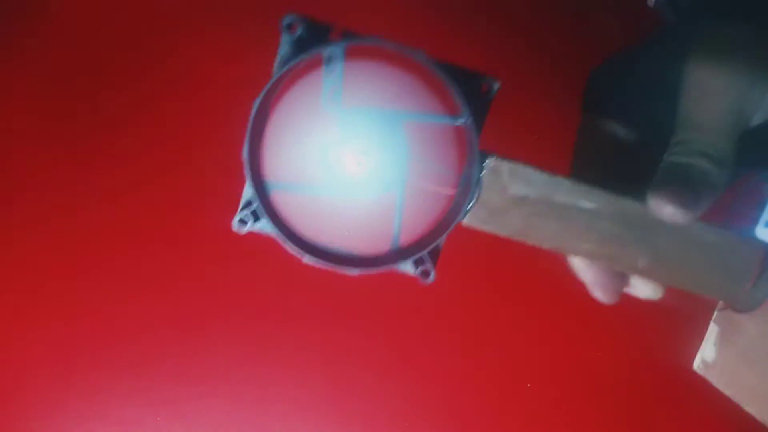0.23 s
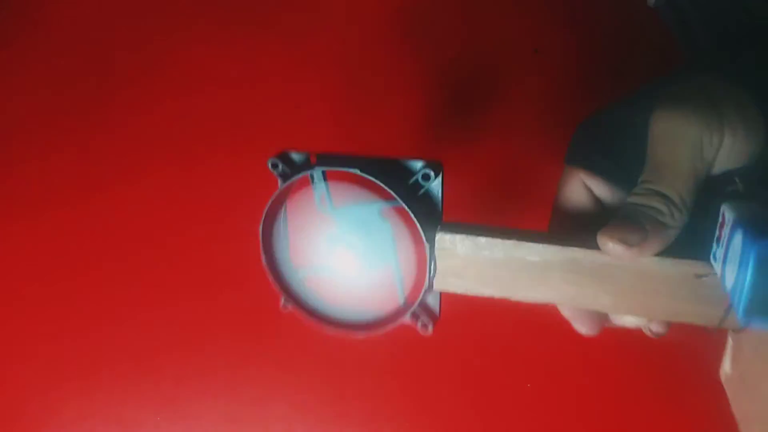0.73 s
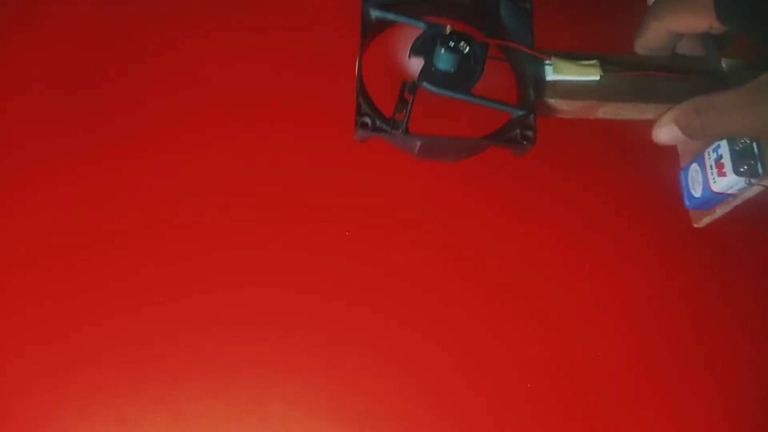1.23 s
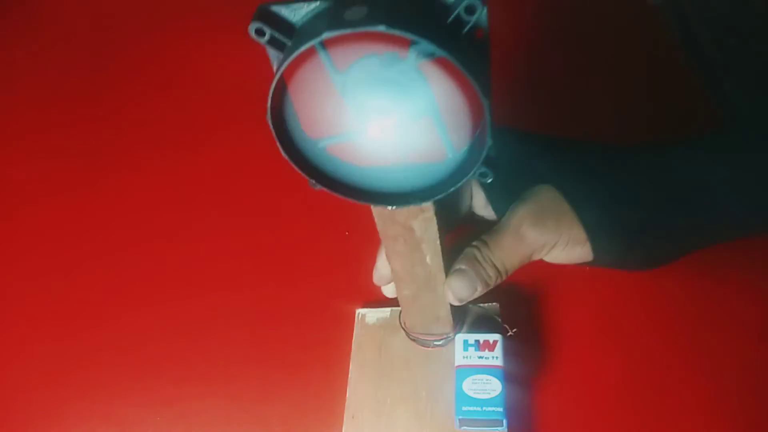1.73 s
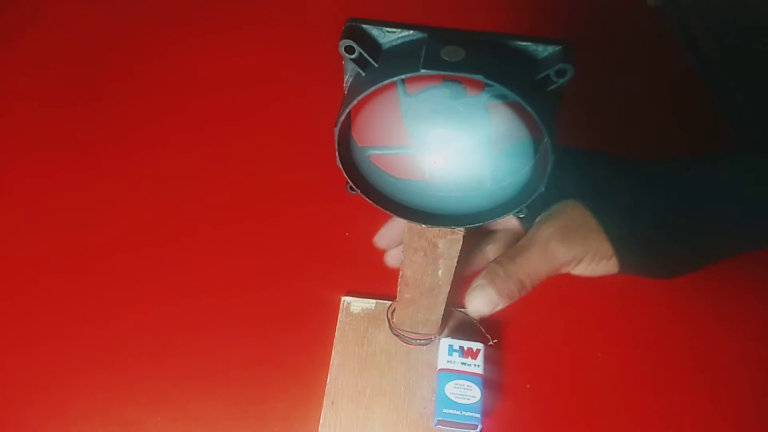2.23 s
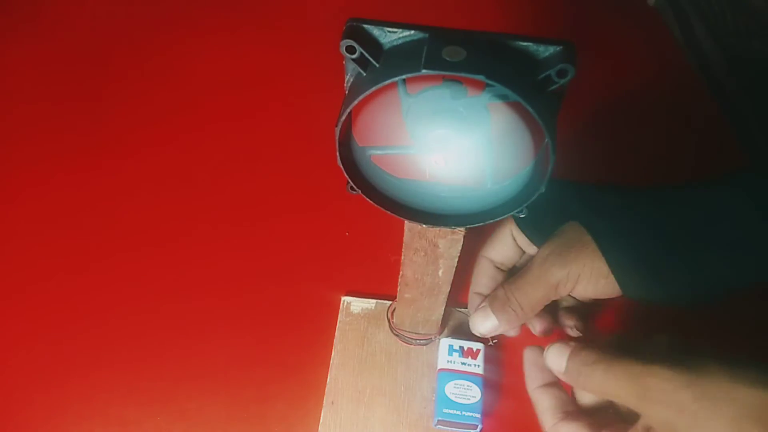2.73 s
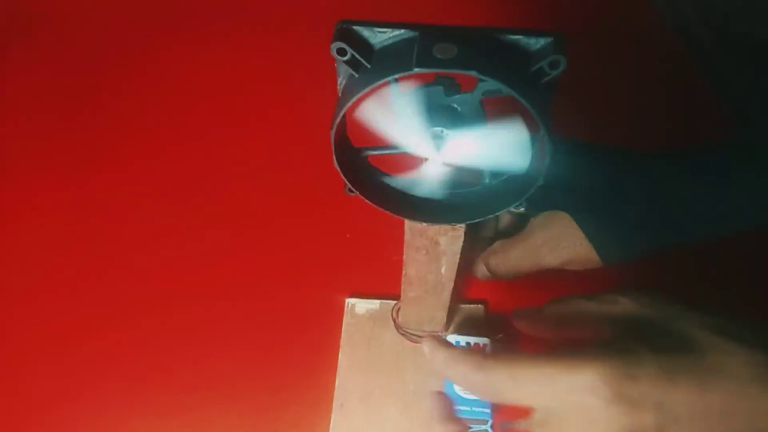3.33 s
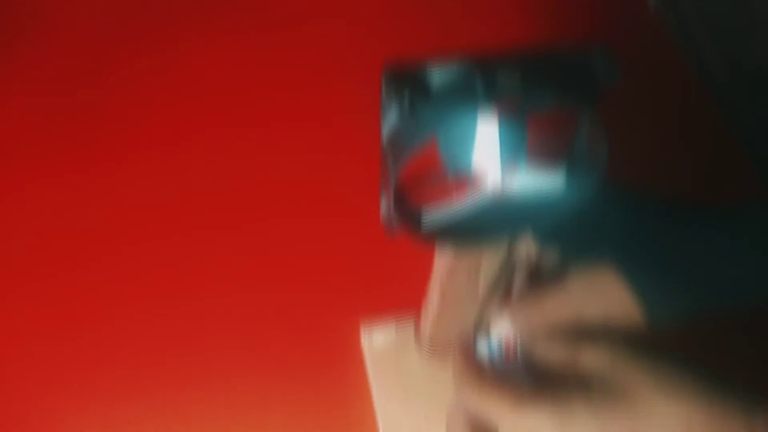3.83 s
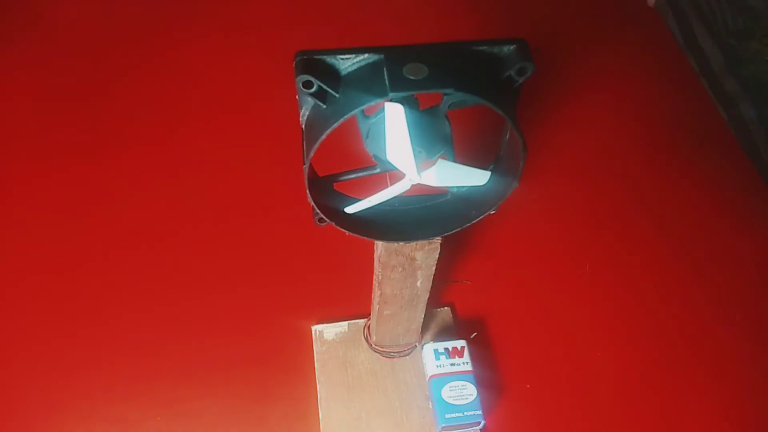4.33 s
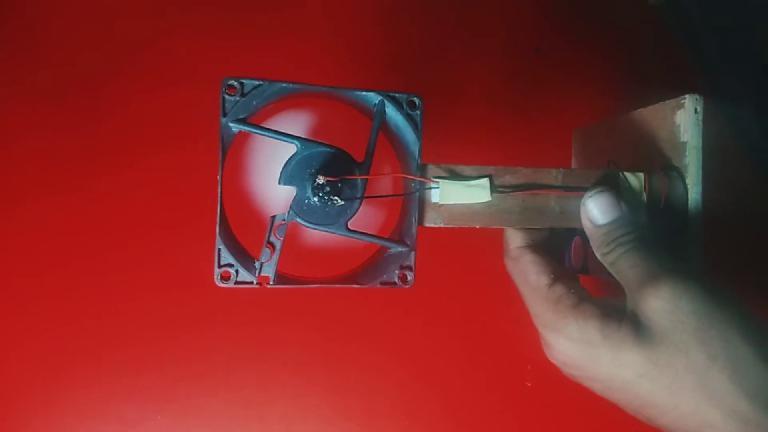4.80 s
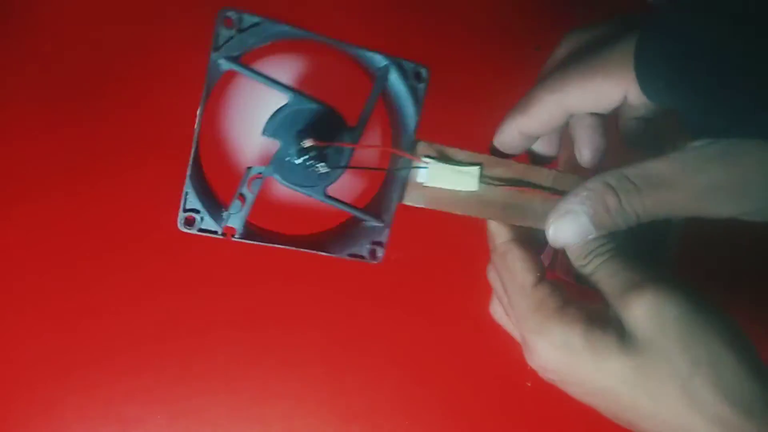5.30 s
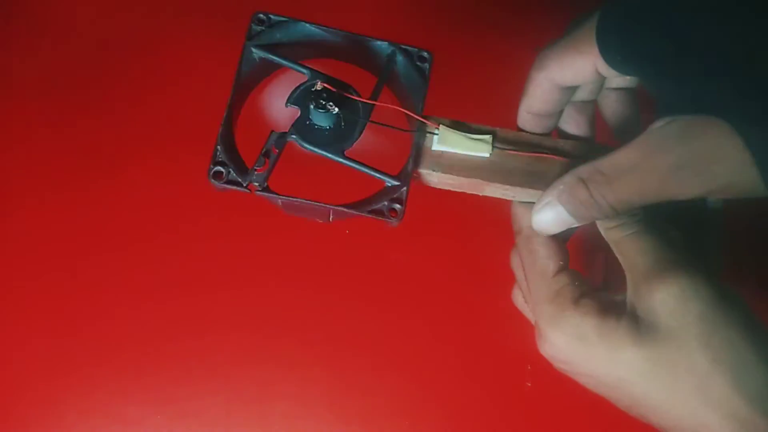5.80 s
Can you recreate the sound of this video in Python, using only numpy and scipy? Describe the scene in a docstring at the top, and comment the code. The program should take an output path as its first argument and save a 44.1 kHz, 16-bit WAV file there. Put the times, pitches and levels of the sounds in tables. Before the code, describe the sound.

A small electric fan whirs, winds down to faint handling noises, then spins up again and runs steadily with soft low thumps.

```python
"""In a quiet room, a small battery motor runs a three-blade fan on a hand-held wooden stand: its shaft
hums and whirls in a loose bearing, its brushes scrape and the plastic frame rings along. At 0.6 s the
battery is cut off and the rotor quickly coasts to a stop, leaving hands that rub, tick and bump close by.
At 3.2 s the battery is back, and the rotor catches and rasps as it speeds up. Near the end the motor's
back is turned to the microphone for about a second, and there is a quick run of louder low thumps."""
import sys
import numpy as np
from scipy import signal
from scipy.fft import rfft, irfft, next_fast_len
from scipy.io import wavfile
from scipy.ndimage import uniform_filter1d, map_coordinates

SR = 44100
rng = np.random.default_rng(int(sys.argv[2]) if len(sys.argv) > 2 else 0)


def materialize(psi):
    """Save the field psi as 16-bit PCM at rate SR to the path in sys.argv[1].

    A 1-D psi becomes a single channel; in a 2-D psi each row is a channel.
    """
    bounded = np.clip(np.atleast_2d(psi).T, -1, 1)
    quanta = np.round(bounded * 32767).astype(np.int16)
    wavfile.write(sys.argv[1], SR, quanta)


N = 267025
TIME = np.arange(N) / SR
SIDES = np.array([[.5], [-.5]])  # shares a difference between left and right


def amp(db):
    """Turn decibels into a gain."""
    return 10 ** (np.asarray(db) / 20)

def unit(x):
    """Scale a sound to an average strength (rms) of 1."""
    return x / np.sqrt(np.mean(x ** 2) + 1e-20)

def along(points, hz):
    """Read between (f/Hz, value) points on a log frequency axis."""
    f, v = np.transpose(points)
    return np.interp(np.log(hz + 1), np.log(f + 1), v)

def curves(rows):
    """One value per sample for each column after the time."""
    s, *columns = np.transpose(rows)
    return [np.interp(TIME, s, column) for column in columns]

def wobble(rate):
    """A smooth random curve through `rate` points a second."""
    return map_coordinates(rng.standard_normal(int(N * rate / SR) + 4), [TIME * rate])

def decay(s, db, ring_s, rise_s):
    """A loudness curve that rises at time s, then falls 60 dB in ring_s."""
    t = np.maximum(TIME - s, 0)
    return amp(db - 60 * t / ring_s) * (1 - np.exp(-t / rise_s))

def swell(s, length):
    """A smooth rise to 1 and fall, centred on time s."""
    return np.exp(-(2 * (TIME - s) / length) ** 2)

def add(track, s, sound):
    """Mix a sound into the track at time s."""
    part = track[:, round(s * SR):][:, :sound.shape[-1]]
    part += sound[..., :part.shape[1]]

def filtered(x, response):
    """Give each frequency of a sound the gain response(hz)."""
    size = next_fast_len(N + SR // 2)
    return irfft(rfft(x, size) * response(np.fft.rfftfreq(size, 1 / SR)), size)[..., :N]

def patchy(x, depth_db):
    """Make brief patches of a sound's spectrum louder and softer by chance."""
    spectra = signal.stft(x, nperseg=256)[2]
    patches = uniform_filter1d(rng.standard_normal(spectra.shape[1:]), size=6, axis=0)
    patches = unit(uniform_filter1d(patches, size=9, axis=1))
    return unit(signal.istft(spectra * amp(depth_db * patches), nperseg=256)[1][:, :N])

# How alike left and right are: f/Hz, likeness/0-1
LIKENESS = [(60, .2), (250, .55), (1000, .6), (2000, .55), (4000, .45), (8000, .65), (11000, .6),
            (14000, .42)]
def noise(colour):
    """Stereo noise of strength 1, partly alike in both ears; the colour table sets only its shape."""
    def response(hz):
        width = np.arccos(np.clip(along(LIKENESS, hz), -1, 1)) / 2
        return amp(along(colour, hz)) * [np.cos(width), np.sin(width)]
    mid, side = filtered(rng.standard_normal((2, N)), response)
    return unit(np.array([mid + side, mid - side]))

def ringing(notes):
    """Noise of strength 1 from an object shaken into ringing at its own notes."""
    def response(f):
        return sum((-1) ** k * amp(db) * 1j * f * width / (hz * hz - f * f + 1j * f * width)
                   for k, (hz, width, db) in enumerate(notes))
    shaking = noise([(700, -32), (1300, 1), (4600, -2.5), (6500, -32)])
    return unit(filtered(shaking, response))

def tone(phase, sway_db, spread, rate):
    """A stereo tone of strength 1 whose loudness and direction wander."""
    gain = amp(sway_db * wobble(rate))
    apart = spread * wobble(rate)
    return unit(gain * np.sin([phase + apart, phase - apart]))

# Colour of the room's background: f/Hz, level/dB
ROOM_COLOUR = [(15, -49), (25, -43), (61, 0.5), (91, -2.5), (215, -7), (289, -13), (457, -12.5),
               (945, -19.5), (1270, -21.5), (3930, -29), (6380, -35.5), (14300, -29.5), (15500, -20)]
def quiet_room():
    """A faint, steady rumble with a little hiss."""
    return amp(-65) * noise(ROOM_COLOUR)

def room_echo(fan, ring_s=.39, lowest_hz=300):
    """A short wash of echoes, different at each ear; the small fan sends little bass into the room."""
    sent = filtered(fan, lambda hz: hz ** 4 / (hz ** 4 + lowest_hz ** 4))
    t = TIME[:SR // 2]
    tail = rng.standard_normal((2, len(t))) * amp(-60 * t / ring_s) * (t > .004)
    return signal.fftconvolve(sent, tail / np.linalg.norm(tail[0]), axes=1)[:, :N]

# Colours of dry rubbing and of fine hiss, for fingers and motor alike: f/Hz, level/dB
RUB_COLOUR = [(290, -21), (500, 0.5), (1130, -2.5), (1300, -3), (2800, -5.5), (4540, -9.5), (6300, -26.5),
              (15000, -18)]
HISS_COLOUR = [(3000, -13), (6500, -9.5), (8300, -16), (11000, -5.5), (13500, -1), (15500, 0)]
# Notes of the frame with the motor's can, and of dry skin on wood: f/Hz, width/Hz, level/dB
FRAME_NOTES = [(1844, 58, -1), (2100, 63, -4), (2310, 62, 1.5), (2414, 89, -2.5), (2813, 60, 2),
               (2870, 67, -13), (3230, 96, -5), (3645, 155, -0.5), (3813, 83, 0.5), (4330, 76, -3)]
SKIN_NOTES = [(2760, 77, 10), (4680, 140, -8), (3920, 290, -3)]
# Fingers slide on the wood, and on the battery clip: middle t/s, length/s, level/dB
WOOD_SLIDES = [(0.927, 0.44, -72), (1.29, 0.19, -71), (1.457, 0.065, -68.5), (1.673, 0.62, -71.5),
               (2.754, 0.098, -73.5)]
CLIP_SLIDES = [(.99, .05, -76), (3.245, 0.047, -70), (3.305, 0.048, -64)]
# Skin squeaks: middle t/s, length/s, f/Hz, level/dB
SKIN_SQUEAKS = [(1.325, .06, 4450, -77), (1.465, 0.047, 4740, -71), (1.535, .09, 2830, -73),
                (1.53, .1, 4950, -77), (1.98, .035, 3000, -72), (1.835, .025, 4140, -78),
                (2.755, .05, 1400, -72)]
# Ticks of wire and battery: t/s, level/dB, ring time/s, added bright snap/dB
WIRE_TICKS = [(1.813, -52.5, .016, -20), (1.819, -63, .04, -5), (1.829, -56.5, .016, -2),
              (1.832, -65, .05, 9), (1.959, -62.5, .11, -25), (1.978, -65, .06, -25)]
def fingers():
    """Skin rustles and squeaks faintly on the wood; wire and battery tick; the frame rings along."""
    body = noise(RUB_COLOUR) + amp(-15.5) * ringing(FRAME_NOTES) + amp(-11.5) * ringing(SKIN_NOTES)
    snap = noise(HISS_COLOUR)
    ticks = sum(decay(s, db, ring_s, rise_s=.0007) * (body + amp(snap_db) * snap)
                for s, db, ring_s, snap_db in WIRE_TICKS)
    rustle = sum(amp(db) * swell(s, length) for s, length, db in WOOD_SLIDES) * (body + amp(-3) * snap)
    squeaks = sum(amp(db) * swell(s, length) * ringing([(hz, 220, 0)])
                  for s, length, hz, db in SKIN_SQUEAKS)
    hiss = sum(amp(db) * swell(s, length) for s, length, db in CLIP_SLIDES) * snap
    return amp(wobble(150)) * (rustle + squeaks + hiss) + ticks

# Short sliding low tones: t/s, length/s, start f/Hz, end f/Hz, level/dB
GROANS = [(0.687, 0.075, 326, 280, -54), (0.8, 0.038, 231.3, 215, -56.5), (1.175, 0.13, 369, 343, -57.5),
          (1.178, 0.21, 237.4, 212, -55.5), (1.307, 0.058, 323, 338, -61), (1.426, 0.05, 278, 270, -52.5),
          (1.51, 0.054, 262, 245, -53.5), (1.618, 0.1, 226, 216, -46.5), (1.721, 0.04, 223, 216, -49),
          (3.317, 0.097, 62.4, 87, -46.5), (3.398, 0.098, 305, 377, -48.5)]
def groans():
    """Short rough low tones that slide in pitch: rubs, and the rotor slowing or speeding up."""
    out = np.zeros((2, N))
    for s, length, start_hz, end_hz, db in GROANS:
        n = int(length * SR)
        hz = np.linspace(start_hz, end_hz, n) * (1 + .052 * wobble(156)[:n])
        loudness = amp(db + 3.5 * wobble(77.5)[:n]) * np.sin(np.linspace(0, np.pi, n))
        add(out, s, loudness * np.sin(2 * np.pi * np.cumsum(hz) / SR))
    return out

# Low thumps, with a quick run of louder ones near the end: t/s, length/s, level/dB, f/Hz
THUMPS = [(0.043, .02, -37.5, 133), (0.135, .02, -38.5, 136), (0.727, .1, -50, 117), (0.897, .1, -49, 99),
          (1.547, .06, -56.5, 88), (1.816, .06, -54, 79.7), (2.087, .02, -48.5, 82), (2.157, .06, -51, 77),
          (2.294, .02, -55.5, 75), (2.445, .02, -53, 83.5), (2.607, .1, -48.5, 76),
          (2.881, .02, -52, 204.6), (3.027, .02, -57, 94), (3.211, .06, -51.5, 199.4),
          (3.233, .02, -50.5, 91), (4.037, .02, -37, 85), (4.36, .02, -37, 100), (4.406, .02, -31.5, 138),
          (4.734, .02, -37, 184), (4.804, .02, -32.5, 142), (4.996, .02, -39, 143),
          (5.125, .02, -34.5, 138.7), (5.357, .06, -30.5, 111.1), (5.478, .02, -30.5, 112.9),
          (5.566, .02, -22, 162.6), (5.606, .02, -27.5, 114.9), (5.648, .02, -28.5, 130),
          (5.68, .02, -25, 118), (5.718, .02, -27.5, 120), (5.755, .02, -23, 122),
          (5.785, .02, -27.5, 105.1), (5.9, .02, -29, 113)]
def thump_list(gap_s=.037, nudge_count=24, nudge_db=-55.5, nudge_hz=83.3):
    """Thumps as (t/s, level/dB, f/Hz): one or an uneven run per row, plus faint chance nudges."""
    runs = [(s + delay, db, hz, delay > 0)
            for s, length, db, hz in THUMPS for delay in np.arange(0, length, gap_s)]
    nudges = [(s, nudge_db, nudge_hz, True) for s in rng.uniform(0, N / SR, nudge_count)]
    s, db, hz, uneven = np.transpose(nudges + runs)
    later, stronger, higher = uneven * (rng.standard_normal((len(s), 3)) * [.002, 1.2, .1]).T
    return zip(np.abs(s + later), db + stronger, hz * np.exp(higher))

# Notes of a thump: multiple of its pitch, level/dB
THUMP_NOTES = [(.7, -4.5), (0.999, 5.5), (1.5, -8.5), (2.3, -11.5)]
# Colour of its dull thud: f/Hz, level/dB
THUD_COLOUR = [(30, -32), (65, 0), (100, 0), (160, -2.5), (215, 1.5), (280, -28.5), (350, -12), (480, -38),
               (1200, -40)]
def thumps(ring_s=.11, rise_s=.0058):
    """Soft low thumps, many from hands on the stand: each a dull thud and a few swings that die away."""
    out, t = np.zeros((2, N)), TIME[:SR // 3]
    ratio, note_db = np.transpose(THUMP_NOTES)[:, :, None]
    thuds = noise(THUD_COLOUR)
    for s, db, hz in thump_list():
        apart = .57 * rng.choice([-1, 1], (len(THUMP_NOTES), 1))  # left and right swing out of step
        phase = 2 * np.pi * hz * ratio * t + np.array([apart, -apart])
        ring = (amp(note_db) * np.sin(phase)).sum(axis=1)
        thud = np.roll(thuds, -round(s * SR), axis=1)[:, :len(t)]
        loudness = amp(db - 60 * t / ring_s) * (1 - np.exp(-t / rise_s))
        add(out, s, loudness * (ring + amp(-2) * thud))
    return out * amp(-5.5 * SIDES)  # louder on the right

# The starting rotor catches: t/s, level/dB, ring time/s
CATCHES = [(3.24, -62.5, .12), (3.276, -60, .04), (3.297, -55, .045), (3.344, -50.5, .12),
           (3.372, -55, .06), (3.398, -47.5, .11), (3.416, -47, .09), (3.461, -42.5, .06),
           (3.488, -44, .05), (3.538, -34.5, .05), (3.616, -32, .04)]
# Notes that a catch rings with: f/Hz, width/Hz, level/dB
CATCH_NOTES = [(1190, 58, 3), (1500, 96, -4), (2210, 73, -3), (2790, 64, -2), (3540, 70, -7),
               (3800, 130, -5)]
# Colour of the frame when scraped: f/Hz, level/dB
FRAME_COLOUR = [(40, -11.5), (80, 2), (190, 0), (280, -13), (400, -9), (500, 1), (610, -22), (740, -14),
                (900, -1), (1200, -4.5), (1420, 1.5), (1640, -5.5), (1900, 0.5), (2700, -3.5), (3350, -2.5),
                (4100, -6), (5000, -20.5), (8000, -39), (12000, -50)]
def rotor_rasps():
    """The rotor catches as it starts, shaking the frame in short scratchy bursts."""
    bursts = sum(decay(s, db, ring_s, rise_s=.004) for s, db, ring_s in CATCHES)
    grain = amp(3.5 * wobble(450))
    return bursts * unit(grain * (ringing(CATCH_NOTES) + noise(FRAME_COLOUR)))

# Tones of the whirl: multiple of the whirl rate, level/dB
WHIRL_TONES = [(1, -13.5), (2, 0), (2.96, -0.5), (4, -8.5), (5, -9), (6.9, -9)]
# The whirl at full speed: t/s, level of the two low tones/dB, level of the upper tones/dB
WHIRL_LOUDNESS = [(0, -44.5, -47), (.56, -45, -51), (3.45, -42.5, -38), (3.6, -40, -44), (3.9, -42, -40.5),
                  (4.4, -40, -38), (4.9, -45, -40), (5.4, -41.5, -42.5), (5.8, -40.5, -45)]
# The shaft whirls harder for a moment: middle t/s, boost of the low tones/dB
WHIRL_FLARES = [(4.98, 9), (5.035, 9)]
def bearing_whirl(shaft_hz, coasting, behind):
    """The shaft rolls unsteadily round its loose bearing: fuzzy tones, richer and steadier when fast."""
    speed = np.maximum(shaft_hz / shaft_hz.max(), .1)
    slow = 1 - speed
    low_db, high_db = curves(WHIRL_LOUDNESS)
    flares_db = sum(db * swell(s, length=.037) for s, db in WHIRL_FLARES)
    low_db += 3.5 * behind + 1.2 * wobble(16) + flares_db
    high_db += 1.5 * wobble(45)
    whirls_per_turn = 2.82 - .025 * behind
    unsteady = 1 + (.008 + .05 * slow) * wobble(22) + (.014 + .08 * slow) * wobble(190)
    angle = 2 * np.pi * np.cumsum(shaft_hz * whirls_per_turn * unsteady) / SR
    tones = 0
    for k, db in WHIRL_TONES:
        gain = amp(db + (low_db if k < 2.5 else high_db)) * speed ** (3 * (k - 2))
        tones += gain * tone(k * angle, sway_db=3, spread=.65, rate=60)
    rolling = np.clip((speed - .33) / .36, 0, 1)  # silent below a third of full speed
    break_up = amp(9 * slow * wobble(60))
    return amp(-41 * slow - 3.5 * coasting) * rolling * break_up * tones

# Notes of the motor's can and of its bracket: f/Hz, width/Hz, level/dB
CAN_NOTES = [(3230, 100, -9), (3372, 76, -7.5), (3420, 55, -8)]
BRACKET_NOTES = [(1391, 37, 2.5), (1457, 36, 7)]
# Colours of the scrape's sharp edge, and of the scrape through the motor's back: f/Hz, level/dB
EDGE_COLOUR = [(2800, -28), (4000, 3.5), (4700, -0.5), (5500, -2.5), (8000, -26), (12000, -46)]
VENT_COLOUR = [(200, -24), (450, -28), (720, 3), (1100, 6.5), (2500, -13), (4300, 4.5), (5600, -17),
               (7200, -17), (9500, -49)]
def brushes(shaft_hz, coasting, behind):
    """Scrape and fine hiss of the brushes (the contacts on the shaft); frame, bracket and can ring."""
    slow = 1 - shaft_hz / shaft_hz.max()
    once_a_turn = np.sin(2 * np.pi * np.cumsum(shaft_hz) / SR)
    level_db = -36 - 51.5 * slow ** 1.23 - 4.5 * slow * coasting
    pulse_db = (6.5 + 5 * coasting) * slow * once_a_turn  # a slow rotor pulses and rattles
    pressure = unit(amp(.89 * wobble(900) + 1.04 * wobble(55) + .3 * wobble(13)))
    stutter_db = 3 * slow * wobble(70)
    contact = amp(level_db + pulse_db + stutter_db) * pressure
    can = amp(-8.2 - 9.1 * behind - 14 * slow + 2.4 * wobble(15)) * ringing(CAN_NOTES)
    bracket = amp(-10 - 14 * slow) * ringing(BRACKET_NOTES)
    edge = amp(-10.5 - 12 * slow + .5 * coasting) * noise(EDGE_COLOUR)
    frame = amp(-1.04 - 2.3 * slow) * noise(FRAME_COLOUR)
    ring = amp(-6.5 - 3.6 * slow - .5 * behind) * ringing(FRAME_NOTES)
    hiss_db = -6.2 + 2.1 * behind - 8.8 * slow + .8 * wobble(24)
    hiss = amp(hiss_db) * patchy(noise(HISS_COLOUR), depth_db=1.2)
    vent = behind * amp(-8.5) * noise(VENT_COLOUR)
    return contact * (frame + ring + can + bracket + edge + vent), contact * hiss

def bearing_scrape(shaft_hz, coasting):
    """The dry bearing scrapes faintly while the rotor coasts, swelling once a turn."""
    angle = 2 * np.pi * np.cumsum(shaft_hz) / SR
    return coasting * amp(-64.5 + 2 * np.sin(angle)) * noise(RUB_COLOUR)

# Tones of the shaft: multiple of the turning rate, level/dB, change when heard from behind/dB
SHAFT_TONES = [(1, -41.5, -5), (2, -52.5, -4.5), (3, -58.5, 6.5), (4, -81, 9), (5, -57.5, 5.5),
               (6, -48, -2), (6.5, -64, 5), (7, -54, -14), (8, -53, -4), (9, -60, 7.5), (10, -57.5, 10.5),
               (11, -54.5, 3), (14, -55.5, 5.5), (19, -54.5, -2)]
# Where the hum sits: t/s, left minus right level/dB
HUM_SIDE = [(0.3, -1), (3.9, 1), (4.9, 5.5)]
def shaft_hum(shaft_hz, behind, hum_db, blade_db):
    """The off-balance shaft hums; the blades and the switching contacts add tones, louder with speed."""
    speed = np.maximum(shaft_hz / shaft_hz.max(), .01)
    unsteady = 1 + .0035 * wobble(25) + .005 * wobble(130)
    angle = 2 * np.pi * np.cumsum(shaft_hz * unsteady) / SR
    tones = []
    for k, db, behind_db in SHAFT_TONES:
        sway_db, spread, rate = (.84, .26, 24) if k == 1 else (3.5, .52, 22)  # the lowest is firmest
        tones.append(amp(db + behind * behind_db) * tone(k * angle, sway_db, spread, rate))
    unbalance, octave, blades, *switching = tones
    radiated = 1 / np.hypot(1, (.76 / speed) ** 8)  # the frame gives off little hum below 76% speed
    hum = amp(hum_db + SIDES * curves(HUM_SIDE)[0]) * radiated * unbalance
    return hum + speed ** 4.3 * (octave + amp(blade_db) * blades + sum(switching))

# The full speed that the battery can drive: t/s, turning rate f/Hz
TOP_SPEED = [(0, 171.7), (.2, 179.2), (.56, 175.9), (3.8, 175.1), (4.5, 173.7), (5.2, 173.4), (5.8, 172.6)]
def rotor(cut_s=.597, restart_s=3.156, drag_s=.305, spin_up_s=.275):
    """Turning rate, and when power is off: drag and friction stop the rotor, the battery restarts it."""
    friction = .7  # dry friction compared with air drag at full speed
    run_down = (1 + friction) * np.exp(-np.maximum(TIME - cut_s, 0) / drag_s) - friction
    spin_up = 1 - np.exp(-(np.maximum(TIME - restart_s, 0) / spin_up_s) ** 2)
    shaft_hz = np.maximum(run_down, spin_up) * curves(TOP_SPEED)[0]
    return shaft_hz, (TIME > cut_s) & (TIME < restart_s)

# How the fan is held: t/s, left delay/ms, back toward the microphone/0-1, hum boost/dB, blade boost/dB
FAN_POSE = [(0, 0.1, 0.1, -3, 13), (.16, 0.039, 0.01, 2, 4.5), (.55, 0.047, 0.08, 1, 8),
            (3.47, -0.025, 0.12, -6, -6), (3.52, -0.015, 0.1, -0.5, -9), (3.9, -0.035, 0.07, 0, -2),
            (4.4, -0.034, 0.06, -1.5, -6), (4.7, 0.023, .8, 1.5, 1.5), (5.1, 0.022, .9, 1.5, -0.5),
            (5.75, 0.061, 0.98, 1, 7), (6.05, 0.046, 0.25, -0.5, 6)]
def fan_motor():
    """The rotor's speed drives hum, whirl and scrape; the hand moves the frame between the ears."""
    shaft_hz, coasting = rotor()
    delay_ms, behind, hum_db, blade_db = curves(FAN_POSE)
    scrape, hiss = brushes(shaft_hz, coasting, behind)
    sound = scrape + bearing_scrape(shaft_hz, coasting) + rotor_rasps()
    sound += shaft_hum(shaft_hz, behind, hum_db, blade_db)
    sound += bearing_whirl(shaft_hz, coasting, behind)
    delayed_samples = np.arange(N) - SIDES * delay_ms * SR / 1000
    placed = np.array([map_coordinates(ear, [at], order=5) for ear, at in zip(sound, delayed_samples)])
    turning = np.clip((shaft_hz - 6) / 15, 0, 1)  # a still rotor is silent
    return turning * (placed + hiss)

def scene():
    """The fan and its echo, low thumps and groans, the fingers, and the quiet room."""
    fan = fan_motor()
    return fan + amp(-10) * room_echo(fan) + thumps() + groans() + fingers() + quiet_room()

# How the microphone's two sides differ: f/Hz, left minus right level/dB
MIC_BALANCE = [(100, -1.5), (300, 4), (600, -2.5), (1000, -3), (2000, -2.5), (4500, -6.5), (8000, 0.5),
               (13000, 2)]
def record(dry, bass_hz=48, top_hz=15550):
    """The microphone colours each side differently, cuts deep bass and passes nothing above top_hz."""
    def response(hz):
        low_cut = (1j * hz) ** 2 / (bass_hz ** 2 - hz ** 2 + 1j * hz * 52)
        return amp(SIDES * along(MIC_BALANCE, hz)) * low_cut ** 2 * (hz < top_hz)
    return filtered(dry, response)


dry = scene()
out = record(dry)
materialize(out)
```